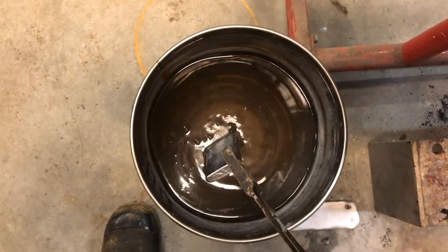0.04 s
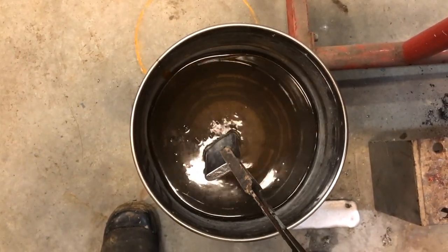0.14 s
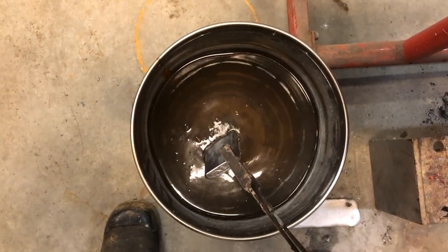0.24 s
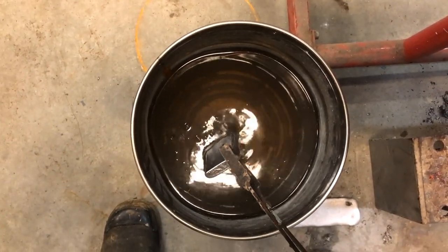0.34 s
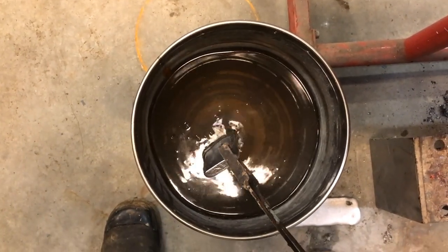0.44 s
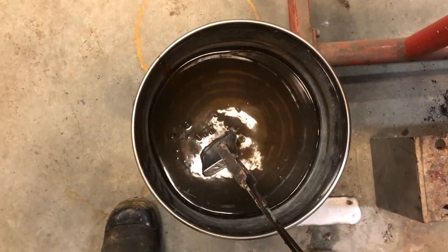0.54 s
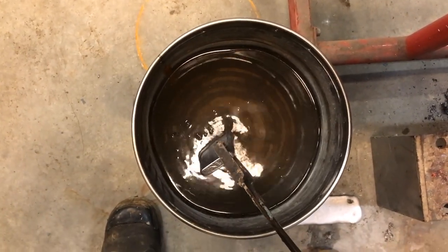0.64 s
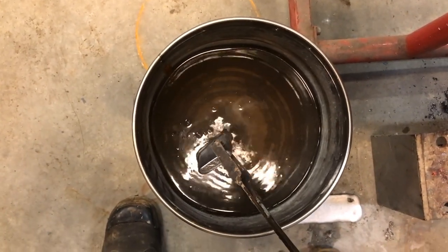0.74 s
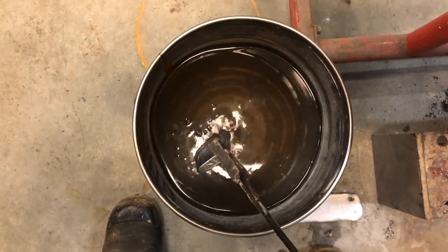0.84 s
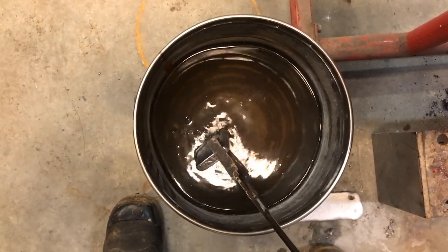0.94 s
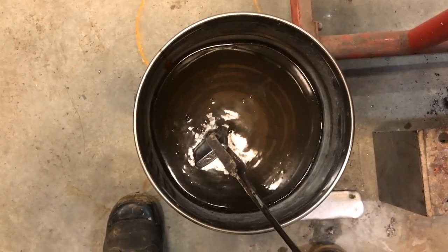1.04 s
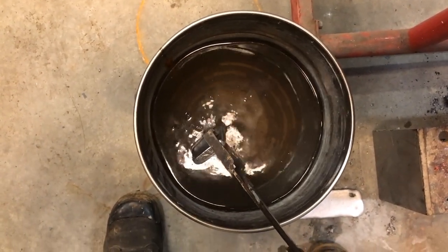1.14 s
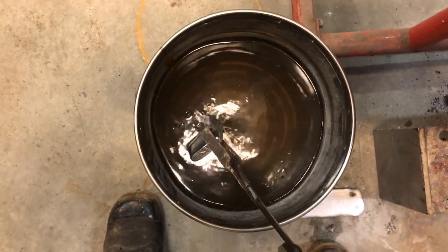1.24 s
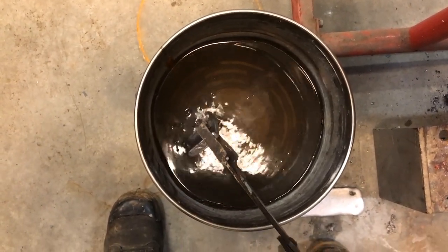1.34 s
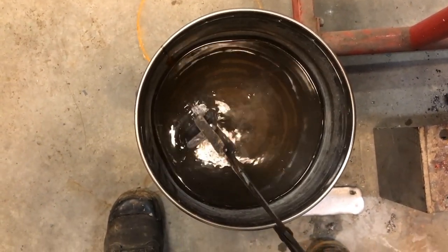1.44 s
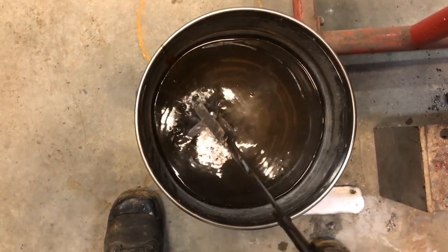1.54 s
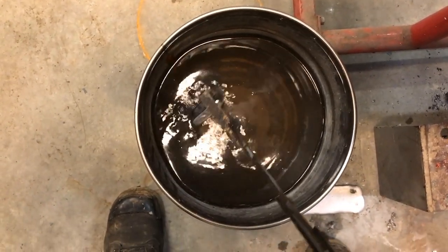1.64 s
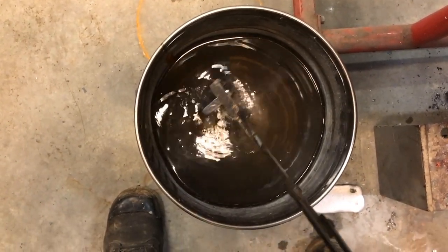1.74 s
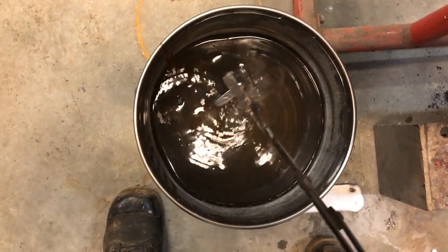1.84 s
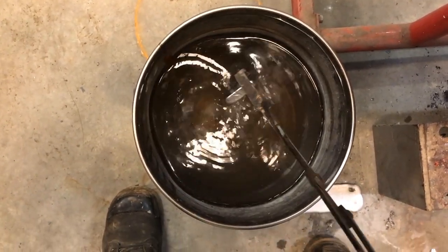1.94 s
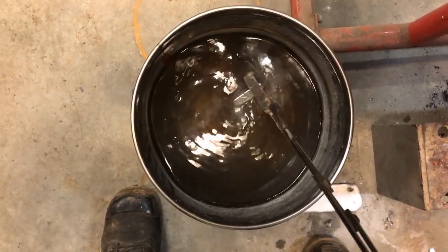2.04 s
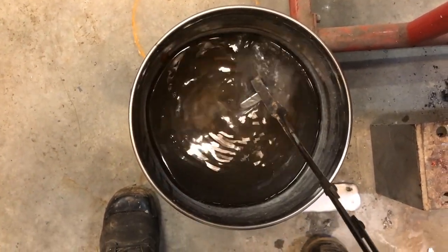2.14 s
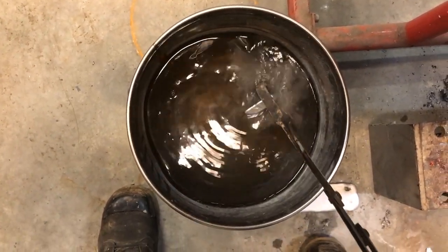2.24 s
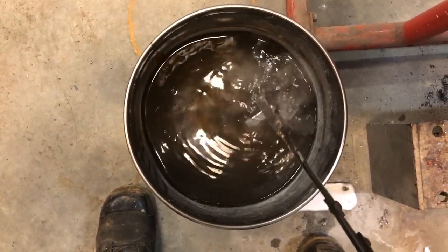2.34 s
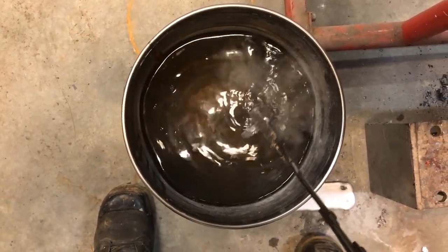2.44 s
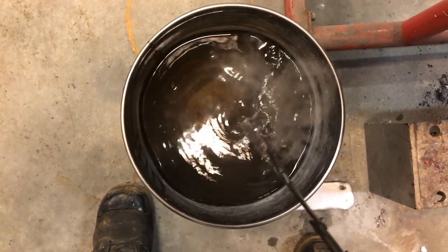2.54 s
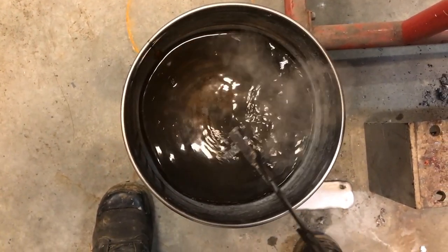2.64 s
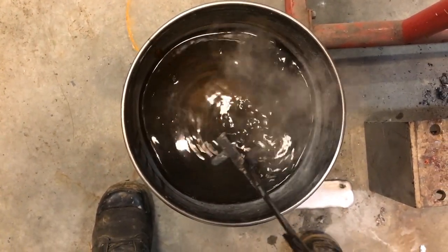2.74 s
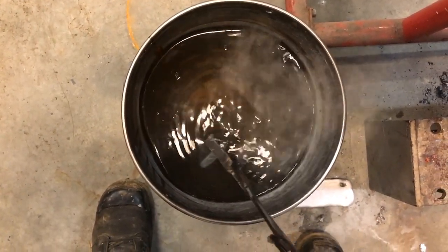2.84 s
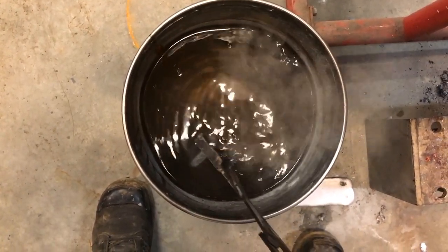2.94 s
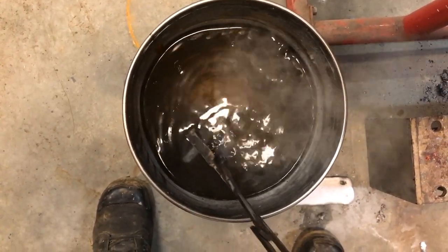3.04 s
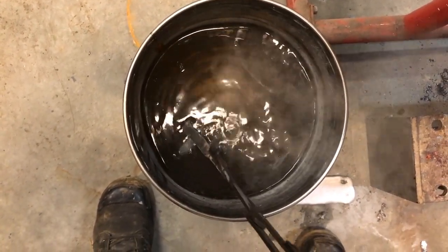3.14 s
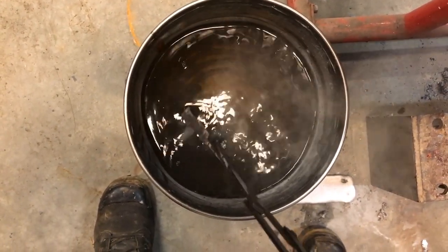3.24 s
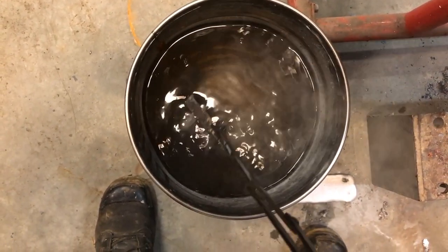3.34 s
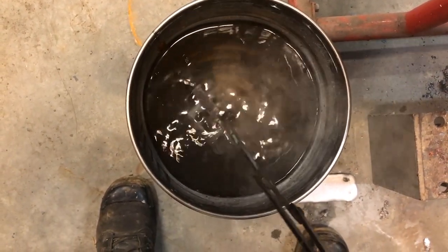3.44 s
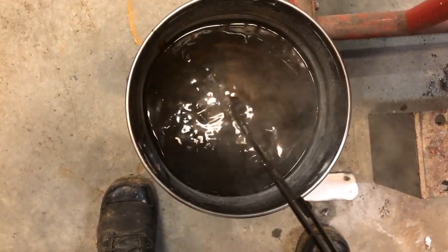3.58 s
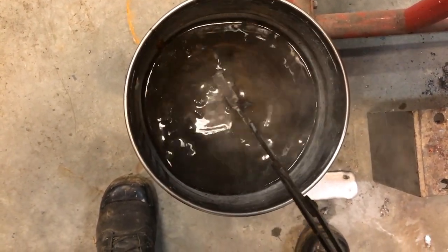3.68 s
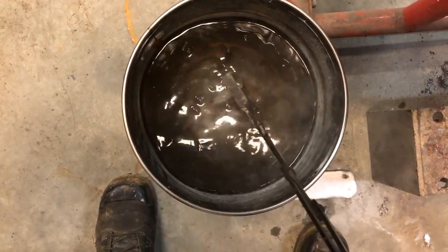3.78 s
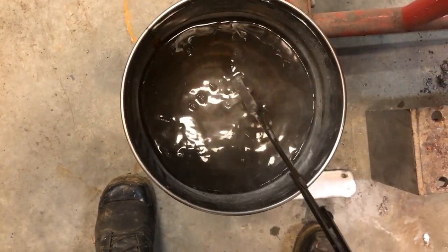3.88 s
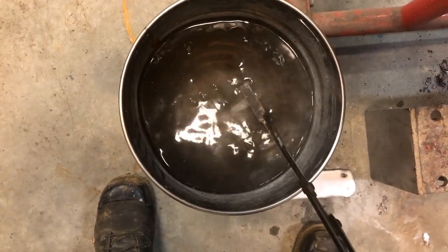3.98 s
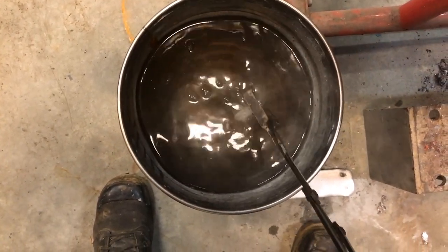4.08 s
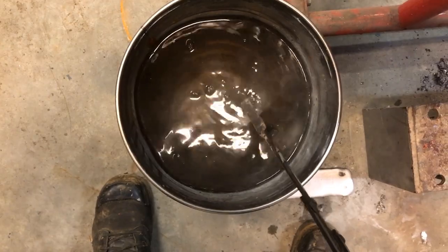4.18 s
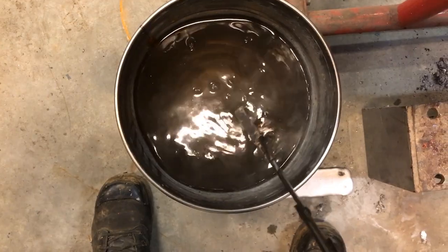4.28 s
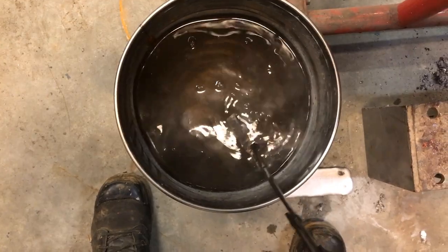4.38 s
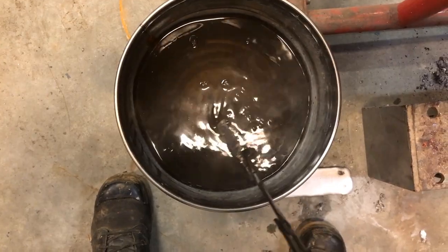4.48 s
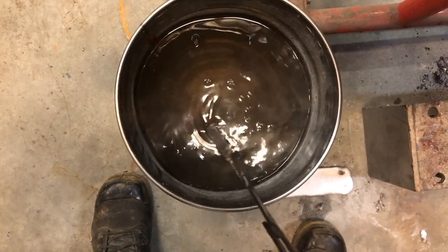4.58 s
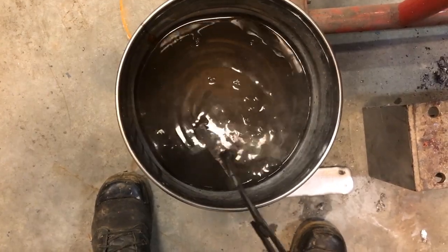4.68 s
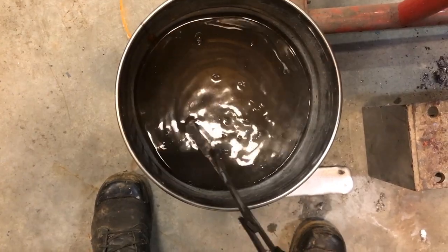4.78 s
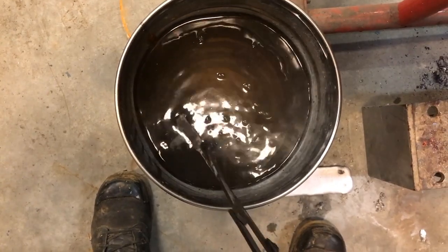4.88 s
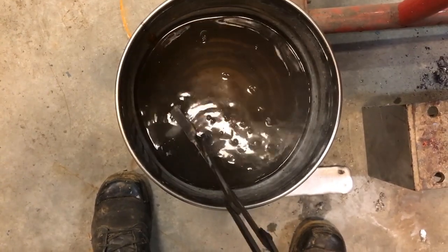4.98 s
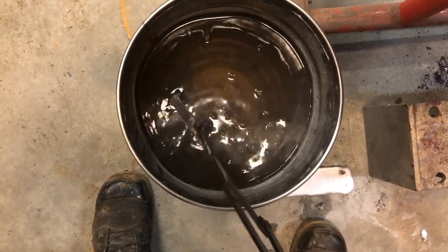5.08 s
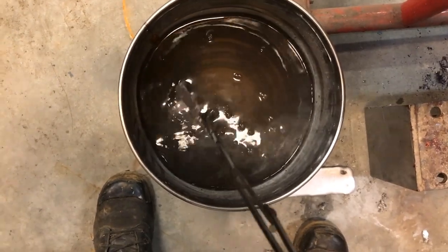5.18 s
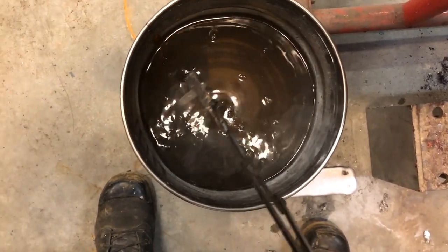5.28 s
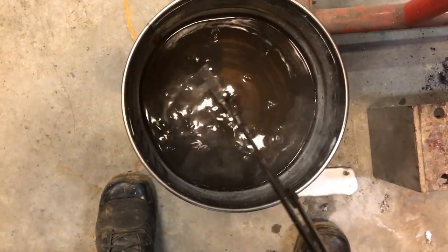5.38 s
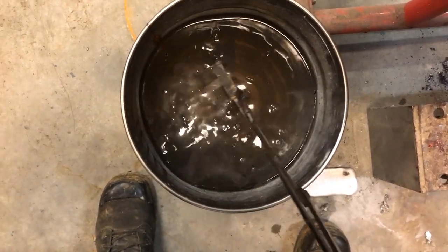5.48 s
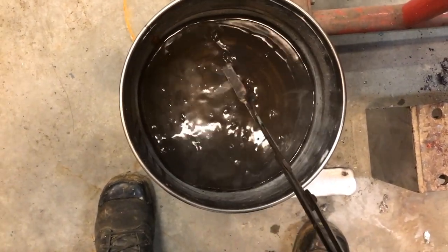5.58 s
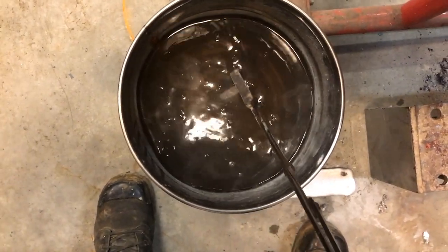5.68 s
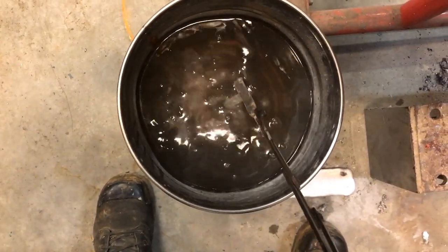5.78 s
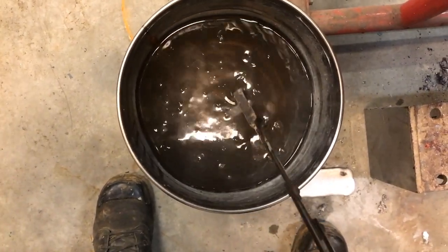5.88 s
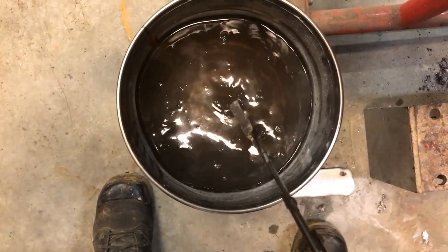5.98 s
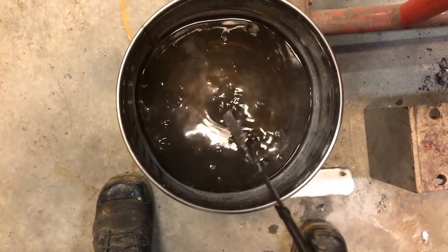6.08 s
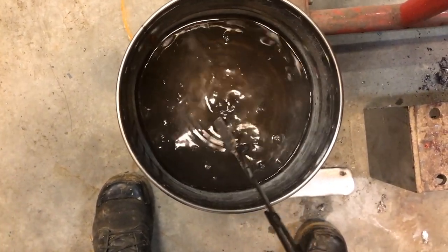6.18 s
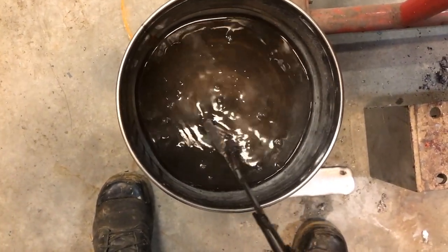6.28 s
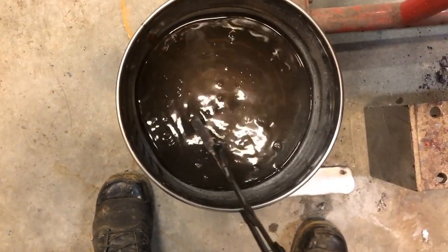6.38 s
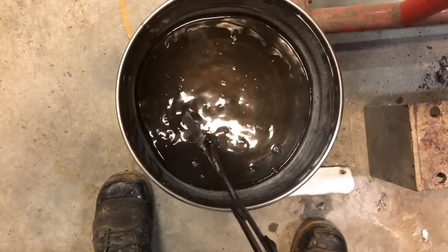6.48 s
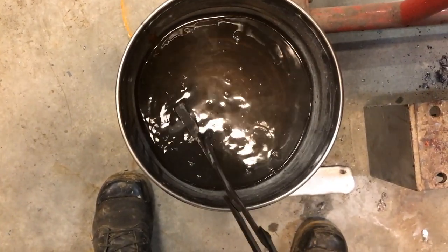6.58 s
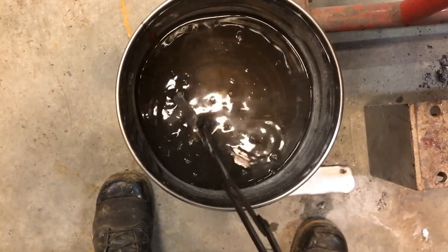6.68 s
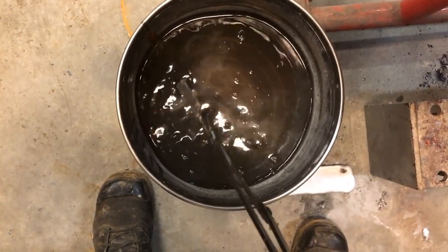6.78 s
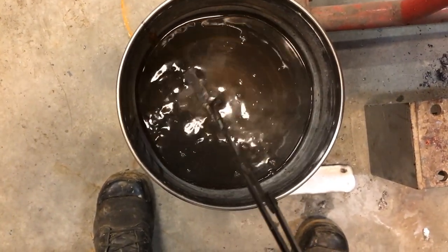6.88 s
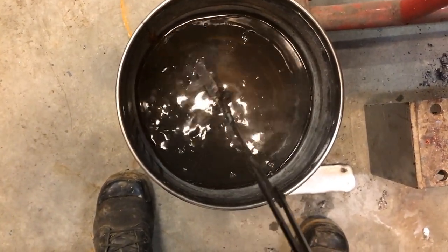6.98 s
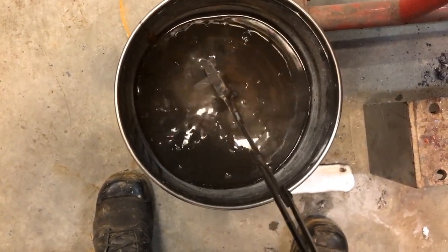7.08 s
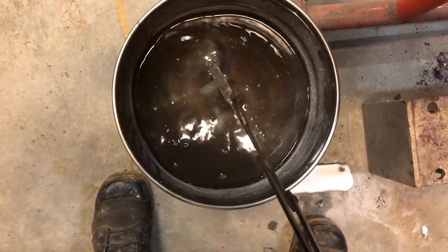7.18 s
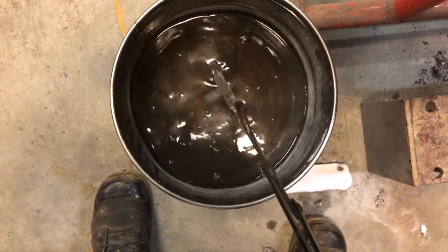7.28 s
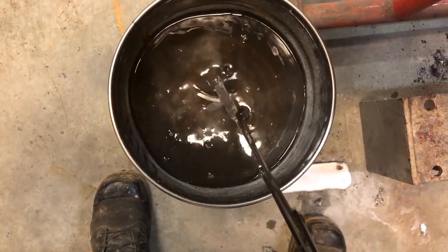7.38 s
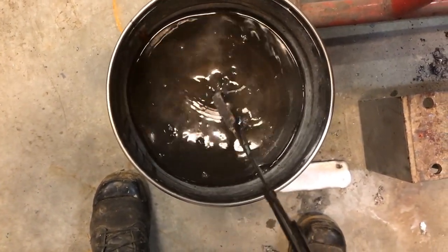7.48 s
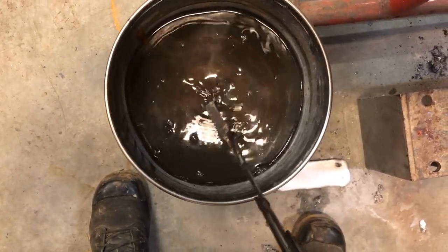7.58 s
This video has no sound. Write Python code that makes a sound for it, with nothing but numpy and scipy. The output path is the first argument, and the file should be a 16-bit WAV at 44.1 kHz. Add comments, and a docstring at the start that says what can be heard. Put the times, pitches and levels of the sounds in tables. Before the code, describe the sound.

From the start, hot steel in a metal bucket of water gives a loud, sputtering hiss, dotted with tiny falling chirps and crackles, heard from close above. The hiss chokes briefly at 1.5 seconds, then surges to its most violent until about 2.6 seconds, with squeaky bubbles, fluttering steam whistles and a few soft, low gulps around 2 seconds. After 3 seconds the hiss weakens, with one more sharp burst of chirps near 3.4 seconds. From 3.5 to 6 seconds, boiling under the water makes the bucket drone hollowly over gentle sloshing as the steel is stirred. A quick cluster of pops and knocks comes between 5.6 and 6.4 seconds. Everything then dies away, leaving a faint, fine fizz over quiet workshop air by 7 seconds, with a soft, low rustle around 7.5 seconds.

```python
"""Hot steel quenching in a metal bucket of water, stirred with tongs; one microphone close above.
Where the bar cuts the surface, steam hisses and whistles and swelling vapour pockets chirp downward.
Under water, collapsing bubbles knock on the bucket, which drones. The cooling bar gives a last few pops,
then only a fine fizz ticks over the quiet of the workshop, with a low rustle at the end."""
import sys
import numpy as np
from scipy import signal
from scipy.fft import rfft, irfft, next_fast_len
from scipy.io import wavfile
from scipy.ndimage import uniform_filter1d

SR = 44100
rng = np.random.default_rng(int(sys.argv[2]) if len(sys.argv) > 2 else 0)


def bounce(signal):
    """Save signal as a 16-bit WAV file at the path given by the first command-line argument."""
    frames = np.transpose(np.atleast_2d(signal))
    limited = np.clip(frames, -1, 1)
    pcm = np.round(limited * 32767).astype(np.int16)
    wavfile.write(sys.argv[1], SR, pcm)


N = 336042
TIME = np.arange(N) / SR
# how violently the surface churns: time_s, share (0-1)
CHURN = [(0, 1), (3.0, 1), (3.6, .35), (7.62, .3)]


def gain_of(db):
    """Decibels to amplitude."""
    return 10 ** (np.asarray(db) / 20)


def unit_rms(x):
    """Scales to rms 1."""
    return x / np.sqrt(np.mean(x ** 2) + 1e-20)


def curves(rows, t=TIME):
    """Each column after a table's time column, read at the times t."""
    times, *columns = np.transpose(rows)
    return [np.interp(t, times, column) for column in columns]


def add(mix, start_s, sound):
    """Mixes a sound in at start_s."""
    part = mix[round(start_s * SR):][:len(sound)]
    part += sound[:len(part)]


def coloured(x, spectrum):
    """Filters x by a spectrum that falls away outside its ends; rms 1."""
    size = next_fast_len(len(x))
    bins_hz = np.fft.rfftfreq(size, 1 / SR)
    hz, db = np.transpose(spectrum)
    shape = gain_of(np.interp(np.log(bins_hz + 1), np.log(hz + 1), db, left=-90, right=-90))
    return unit_rms(irfft(rfft(x, size) * shape, size)[:len(x)])


def resonate(x, hz, width_hz):
    """A steep resonance: twice shifts hz down to zero, smooths and shifts back."""
    turn = np.exp(2j * np.pi * np.cumsum(hz * np.ones(len(x))) / SR)
    pole = np.exp(-np.pi * width_hz / SR)
    for _ in range(2):
        x = 2 * (turn * signal.lfilter([1 - pole], [1, -pole], x / turn)).real
    return x


def ringing(count, hz, width_hz):
    """Noise in a resonance that follows hz; rms 1."""
    return unit_rms(resonate(rng.standard_normal(count), hz, width_hz))


def wander(per_s):
    """A random flutter, about per_s times a second, without slow drift; rms 1."""
    steps = rng.standard_normal(N // 64 + 2)
    span = max(round(SR / 128 / per_s), 1)
    smooth = uniform_filter1d(uniform_filter1d(steps, span), span)
    flutter = smooth - uniform_filter1d(smooth, 6 * span)
    return np.interp(np.arange(N) / 64, np.arange(len(steps)), unit_rms(flutter))


def clicks(per_s, spread_db):
    """Sparse clicks of random sign; a few are large."""
    size = gain_of(spread_db * np.minimum(rng.exponential(1, N), 4)) * rng.choice([-1., 1.], N)
    return size * (rng.random(N) < per_s / SR)


def swells(rows, edge):
    """One hump or dip in dB per row; edge is the share spent rising and falling."""
    out = np.zeros(N)
    for centre_s, length_s, db in rows:
        add(out, centre_s - length_s / 2, db * signal.windows.tukey(round(length_s * SR), edge))
    return out


def steam_rush(patch_db, streak_db):
    """Noise whose colour drifts in short wide patches and long narrow streaks."""
    real, imag, patches, streaks = rng.standard_normal((N // 128 + 5, 257, 4)).T
    patches = unit_rms(uniform_filter1d(uniform_filter1d(patches, 7, axis=0), 14, axis=1))
    streaks = unit_rms(uniform_filter1d(uniform_filter1d(streaks, 2, axis=0), 90, axis=1))
    (churn,) = curves(CHURN, np.arange(real.shape[1]) * 128 / SR)
    spectra = (real + 1j * imag) * gain_of(patch_db * churn * patches + streak_db * streaks)
    return unit_rms(signal.istft(spectra, nperseg=512, noverlap=384)[1][:N])


def steam():
    """Steam sputters as the vapour film tears and closes; narrow bands and small pockets ride on it."""
    # steam at the surface: time_s, hiss_db, body_db, air_db (the last two against the hiss)
    levels = [(0, -30.5, -13.5, -5), (.47, -33, -13, -4), (.8, -31, -11.5, -7), (1.1, -34, -29, -5.5),
              (1.4, -35, -14.5, -3.5), (1.55, -27.5, -4, -6.5), (1.74, -34, 1, -3), (1.9, -30, 0, -4),
              (2.01, -38.5, -9, 1.5), (2.14, -34, 0, -7.5), (2.37, -26.5, -6.5, -1), (2.49, -30, -2, -6.5),
              (2.59, -33, 0, -6.5), (2.63, -36, -5, -8.5), (2.72, -38.5, -6.5, -7.5), (2.95, -41, -7, -7.5),
              (3.05, -46.5, 3.5, 0.5), (3.23, -53, 3, -2), (3.3, -44.5, -14, -4), (3.41, -41, 4, -7),
              (3.5, -49, 1.5, -5.5), (3.85, -47.5, -5, -8), (4.18, -50, -0.5, -7), (4.65, -52, -2, 1),
              (5.1, -52, -3.5, -5.5), (5.5, -57, -3.5, -5.5), (5.85, -63, 8.5, -0.5), (6.27, -55, -13, 2),
              (6.5, -61.5, -8, 3.5), (6.71, -64, -9, 1.5), (6.98, -78, -2, 1.5), (7.3, -80, -4.5, -1.5),
              (7.62, -73.5, -7, 3)]
    # its middle, high and top ranges: frequency_hz, level_db
    body = [(1000, -30.5), (1900, -4.5), (2600, 2), (3200, 4), (4300, 0.5), (5200, -12), (7000, -52.5)]
    hiss = [(2500, -32.5), (4200, -8), (5400, 2), (6800, 2.5), (7700, -0.5), (8500, -0.5), (9600, -3),
            (10400, -17), (12000, -30)]
    air = [(8000, -19.5), (10200, -6.5), (11500, -2), (13000, -3), (16000, -8.5)]
    # steam spurts through the torn film: centre_s, length_s, change_db
    spurts = [(.056, .025, 0.5), (.145, .03, 1), (.565, 0.12, 2.5), (.655, .02, 1.5), (.79, 0.024, 3),
              (.86, 0.077, 3), (.97, 0.19, 3.5), (1.12, 0.093, 5), (1.208, 0.011, 1), (1.23, 0.13, 4),
              (1.231, .01, 4), (1.273, .01, 4.5), (1.36, 0.1, 3), (1.45, 0.17, 4.5), (1.59, 0.041, 4.5),
              (1.89, 0.037, 1.5), (2.1, 0.063, 9), (2.16, 0.04, 6), (2.58, 0.065, 3), (2.632, 0.018, 4),
              (2.66, 0.039, 4), (2.8, 0.036, 3), (2.765, .04, 1), (2.84, .02, -5), (2.865, .03, 2),
              (2.895, .02, 1), (2.935, .02, 5), (2.957, 0.024, 4.5), (3.41, 0.023, 7), (3.54, 0.056, 5)]
    # brief dips in the hiss (near 1.5 s a dunk chokes the steam): centre_s, length_s, change_db
    dips = [(1.495, 0.094, -12.5), (2.3, 0.051, -6), (3.9, .03, -4), (1.5, 0.017, -13)]
    hiss_db, body_db, air_db = curves(levels)
    (churn,) = curves(CHURN)
    surge_db = swells(spurts, edge=1.0) + swells(dips, edge=0.41)
    air_db -= 0.09 * surge_db  # the top range surges a little less
    rush = steam_rush(patch_db=1.7, streak_db=1.7)
    rush += 0.076 * churn * unit_rms(clicks(3000, spread_db=9))
    sputter = gain_of(churn * (.6 * wander(12) + .8 * wander(30) + .7 * wander(110)))
    spray = coloured(rush, hiss)
    spray += gain_of(body_db) * coloured(rush, body) + gain_of(air_db) * coloured(rush, air)
    crowd = gain_of(-4) * small_pockets()
    return gain_of(hiss_db + surge_db) * (sputter * (spray + whistling_bands()) + crowd)


def whistling_bands():
    """Faint narrow whistling bands in the hiss, each fading in and out."""
    # bands: start_s, length_s, start_hz, end_hz, width_hz, level_db (against the hiss)
    bands = [(0, 0.34, 8700, 8900, 500, -9), (0.246, 0.26, 7100, 7140, 400, -8),
             (0.804, 0.76, 6930, 6540, 500, -7), (0.923, 0.57, 5550, 6200, 400, -3.5),
             (2.066, 0.25, 4640, 4900, 350, -6), (2.461, 0.29, 5220, 5530, 349, -4),
             (2.922, 0.34, 7080, 7400, 120, -4.5), (3.244, 0.1, 10000, 5400, 900, -3.5),
             (3.414, 0.13, 8070, 8400, 250, 1.5), (3.894, 0.69, 6600, 6900, 500, -4.5),
             (4.302, 1.0, 2820, 3040, 220, -3), (4.75, 0.49, 5200, 5750, 300, -5.5),
             (4.798, 0.7, 8800, 8400, 400, -8), (4.9, 0.76, 7300, 7270, 120, -10),
             (5.056, 0.87, 6780, 6770, 110, -8), (5.097, .55, 5530, 5340, 250, -12),
             (6.154, 0.33, 8500, 8350, 300, -1.5), (6.0, 0.85, 12460, 12100, 300, -11)]
    out = np.zeros(N)
    for start_s, length_s, start_hz, end_hz, width_hz, db in bands:
        hz = np.geomspace(start_hz, end_hz, round(length_s * SR))
        add(out, start_s, gain_of(db) * ringing(len(hz), hz, width_hz) * signal.windows.tukey(len(hz), .5))
    return out


def pocket_chirp(core_s, start_hz, end_hz, rough):
    """A vapour pocket's ring falls as it swells, then levels off; steam breaks up the rough share."""
    progress = np.linspace(0, 1, round(1.35 * core_s * SR))  # the fades reach beyond the core
    hz = end_hz * (start_hz / end_hz) ** (1.2 * (1 - progress) ** 1.4)
    tone = np.sin(2 * np.pi * (np.cumsum(hz) / SR + rng.random()))
    breath = ringing(len(hz), hz, end_hz / 5) / np.sqrt(2)
    envelope = np.sin(np.pi * progress) ** 1.3
    return (np.sqrt(1 - rough) * tone + np.sqrt(rough) * breath) * envelope


def small_pockets():
    """A crowd of small vapour pockets chirps at random, in 24 sizes."""
    # crowd density: time_s, pockets_per_s
    density = [(0, 344), (1.45, 314), (1.5, 120), (2.7, 140), (3.05, 150), (3.2, 60), (3.5, 60), (3.7, 9.5),
               (7.62, 7.6)]
    (per_s,) = curves(density)
    out = np.zeros(N)
    for hz in np.geomspace(2900, 6500, 24):
        chirp = pocket_chirp(rng.uniform(.003, .009), rng.uniform(1.05, 1.5) * hz, hz, rough=.7)
        births = gain_of(3 * rng.standard_normal(N)) * (rng.random(N) < per_s / 24 / SR)
        out += signal.oaconvolve(births, chirp)[:N]
    return out


def bucket():
    """Collapsing bubbles ring the bucket, sharper ones its high modes; bubbles hum and water sloshes."""
    # boiling under water: time_s, drone_db, sharpness_db, slosh_db
    boil = [(0, -59.5, 7, -70), (.31, -58.5, 5, -74), (.45, -50, -2, -69), (.85, -56, 4.5, -66),
            (1.05, -49, -3, -69), (1.38, -51.5, 0, -63), (1.63, -48.5, 0.5, -60), (2.3, -49, 0, -57),
            (2.5, -50.5, 1, -60.5), (2.8, -55, 8, -63), (3, -46.5, 2.5, -65.5), (3.3, -46.5, 2, -56.5),
            (3.5, -41, -3, -63), (4.5, -39.5, -5, -58), (4.87, -43.5, -2, -60.5), (5.3, -43.5, -3, -60.5),
            (5.65, -38.5, -6, -58), (5.84, -38.5, -6, -57), (5.98, -43.5, -5, -54), (6.17, -51, -1, -65),
            (6.43, -60, 2, -65), (6.7, -72, 1, -71), (7.04, -78.5, 3, -74.5), (7.35, -83, 5.5, -74.5),
            (7.5, -73.5, -3, -72.5), (7.62, -73.5, -4.5, -71.5)]
    # the bucket's modes: pitch_hz, width_hz, level_db
    modes = [(410.4, 68.5, -4), (365.6, 66, -12), (470.5, 120, -8.5), (612, 55, -25), (924, 47, -22.5),
             (834, 76, -12.5), (990, 910, -12.5), (1326, 650, -8.5), (1562, 76, -7), (1644, 60, -9),
             (1733, 170, -7.5), (2070, 90, -17.5), (2310, 250, -19.5), (2578, 320, -12), (3010, 450, -14)]
    # its upper ring against the drone: time_s, level_db
    upper_ring = [(0, 1), (1.3, -4.5), (2, 6.5), (3.2, 1), (3.6, -6), (4.0, 0), (4.5, 0), (5.1, 0.5),
                  (5.7, -3.5), (6, -11), (6.3, 2), (6.85, 3), (7.05, -16.5)]
    # colours of knock and slosh: frequency_hz, level_db
    knock_colour = [(150, -41.5), (300, 1), (600, 11), (1100, 2.5), (1900, 6.5), (3000, -3.5),
                    (5000, -50.5)]
    slosh_colour = [(25, -26), (45, -8), (80, 1.5), (160, 1), (250, 5), (400, -5.5)]
    # large bubbles thump the wall: start_s, level_db
    wall_thumps = [(2.171, -35), (2.264, -34), (4.277, -34), (5.625, -33), (5.644, -28), (5.726, -31),
                   (5.752, -36), (5.795, -37), (5.817, -31), (5.825, -28.5), (5.842, -29.5), (5.876, -28.5),
                   (5.937, -32.5), (5.98, -40), (6.024, -39), (6.085, -45), (6.166, -42)]
    # the bubble cloud on the bar rings higher as its bubbles shrink: time_s, pitch_hz, level_db
    bubble_cloud = [(3.5, 991, -60), (3.8, 1214, -46.5), (4.2, 1480, -47.5), (4.7, 1620, -48.5),
                    (5.3, 1480, -45), (5.6, 1140, -58), (5.9, 1030, -49.5), (6.2, 1280, -53),
                    (6.6, 1395, -75), (6.9, 1400, -86)]
    drone_db, sharp_db, slosh_db = curves(boil)
    (upper_db,) = curves(upper_ring)
    cloud_hz, cloud_db = curves(bubble_cloud)
    collapses = unit_rms(clicks(5000, spread_db=3)) * gain_of(wander(28) + wander(5.3))
    thumps = np.zeros(N)
    for start_s, db in wall_thumps:
        add(thumps, start_s, gain_of(db) * np.diff(np.hanning(110)))  # a push, then a pull
    out = gain_of(drone_db + sharp_db) * coloured(collapses, knock_colour)
    for hz, width_hz, db in modes:
        level_db = drone_db + db + sharp_db * (hz > 600) + upper_db * (hz > 1400)
        level_db += wander(1.4)  # the stirred bar couples to each mode by turns
        out += gain_of(level_db) * unit_rms(resonate(collapses, hz, width_hz))
        click_peak = 2 * np.pi * width_hz / (np.e * SR)
        out += gain_of(db) * resonate(thumps, hz, width_hz) / click_peak
    cloud = gain_of(cloud_db) * ringing(N, cloud_hz, width_hz=350)
    slosh = coloured(rng.standard_normal(N), slosh_colour) * gain_of(slosh_db + 1.7 * wander(14))
    return out + cloud + slosh


def fizz():
    """Tiny bubbles burst at the surface, each size ticking at its own high pitch."""
    # fizz: time_s, level_db
    levels = [(0, -66), (6.4, -71.5), (6.9, -74), (7.62, -76)]
    sizes = [(6400, -5.0), (7400, -0.5), (8500, 0.5), (12500, -4.0)]  # pitch_hz, level_db
    ticks = sum(gain_of(db) * resonate(clicks(45, spread_db=4), hz, width_hz=1500) for hz, db in sizes)
    return gain_of(curves(levels)[0]) * unit_rms(ticks)


def workshop():
    """Steady room tone, mostly low rumble."""
    # workshop air: frequency_hz, level_db
    colour = [(20, -30.5), (40, -4), (110, 0), (220, -14.5), (600, -21), (1500, -30.5), (2800, -30),
              (4200, -30.5), (5500, -35.5), (8000, -28), (11000, -33), (14500, -33), (16000, -40.5)]
    return gain_of(-74) * coloured(rng.standard_normal(N), colour)


def echoes(x, decay_s=0.071):
    """Short tail of the bucket's mouth and the concrete floor: sparse taps of random sign."""
    taps = np.zeros(6000)
    delays = np.arange(100, 5980, 20) + rng.integers(0, 20, 294)
    taps[delays] = rng.choice([-1., 1.], 294) * gain_of(-60 * delays / SR / decay_s)
    return signal.oaconvolve(x, taps / np.linalg.norm(taps))[:N]


def large_pockets():
    """Large vapour pockets swell on the steel, one chirp each."""
    # pockets: start_s, core_s, start_hz, end_hz, level_db
    pockets = [(0.053, 0.0096, 3610, 2320, -26), (0.167, 0.013, 2804, 2400, -25),
               (0.281, .0095, 2980, 2140, -29.5), (0.552, 0.0095, 4124, 2640, -23),
               (.562, 0.01, 2058, 1520, -24), (0.65, 0.00793, 4330, 2880, -23.5),
               (0.748, 0.0048, 3950, 3650, -27.5), (0.789, 0.007, 4000, 3700, -25),
               (0.856, 0.015, 3577, 1664, -28.5), (0.912, .01, 4410, 3060, -34),
               (1.226, 0.011, 4530, 3500, -30), (1.007, 0.0065, 3420, 3200, -27),
               (1.17, .008, 4200, 3000, -33.5), (1.25, .012, 3930, 2620, -35),
               (1.295, 0.011, 3640, 2500, -34.5), (1.028, 0.011, 5170, 2520, -27.5),
               (1.323, 0.013, 4650, 2880, -30.5), (1.378, 0.015, 3780, 1580, -26),
               (1.381, 0.0068, 3580, 3010, -21), (1.428, 0.015, 3364, 2120, -20),
               (1.433, 0.022, 2770, 1430, -24.5), (1.438, .016, 3104, 2960, -19.5),
               (1.444, 0.0096, 1975, 1306, -19.5), (1.539, 0.019, 3605, 3240, -22),
               (1.567, 0.029, 4520, 3140, -20.5), (1.62, 0.012, 3340, 2500, -22),
               (1.639, 0.017, 3385, 2610, -21), (1.659, 0.0055, 3010, 2940, -13.5),
               (1.696, 0.015, 3320, 2850, -19.5), (1.707, 0.012, 4150, 4230, -23),
               (1.709, 0.0096, 3110, 2674, -12.5), (1.735, 0.033, 3050, 3100, -23),
               (1.758, 0.015, 2930, 2980, -21), (1.763, .008, 3440, 3180, -20),
               (1.838, .008, 3100, 2800, -22.5), (1.867, .006, 3250, 3100, -23),
               (1.88, .012, 3200, 2500, -23), (1.582, .012, 3100, 2650, -23),
               (1.789, 0.0093, 3353, 2910, -14.5), (1.815, 0.0083, 3184, 3000, -16),
               (1.853, 0.01, 3440, 3100, -22), (1.898, 0.013, 2884, 1374, -24),
               (1.94, 0.0062, 3550, 3500, -22), (1.956, 0.0075, 3440, 2920, -17),
               (1.959, 0.007, 3310, 2200, -22.5), (1.984, 0.0044, 3200, 2880, -16),
               (2.001, .0067, 5200, 5300, -24.5), (2.083, 0.043, 5080, 4200, -25),
               (2.098, .019, 3040, 2580, -24.5), (2.139, 0.017, 2770, 2740, -23.5),
               (2.154, 0.009, 2120, 2030, -24), (2.159, .011, 1793, 1270, -22),
               (2.208, .008, 2140, 2050, -17), (2.198, 0.026, 4700, 4630, -26),
               (2.213, 0.011, 1847, 1183, -14), (2.263, 0.0065, 2230, 2030, -18),
               (2.273, 0.009, 2860, 2440, -20), (2.281, 0.011, 1670, 1150, -23),
               (2.362, 0.0062, 2220, 1960, -23), (2.442, .01, 2120, 2050, -22),
               (2.474, 0.0096, 1620, 1500, -21), (2.35, 0.0097, 1814, 1610, -9.5),
               (2.354, 0.018, 4910, 3990, -19), (2.364, 0.0069, 4310, 4160, -18.5),
               (2.366, 0.0081, 1710, 1080, -24.5), (2.389, 0.017, 3720, 2720, -21.5),
               (2.414, 0.014, 1670, 1620, -18.5), (2.417, .034, 3490, 2970, -29),
               (2.435, 0.0098, 1660, 1660, -18), (2.458, 0.018, 2770, 1520, -31),
               (2.459, 0.017, 1564, 1600, -18.5), (2.51, 0.008, 2040, 1640, -30),
               (2.548, 0.013, 3510, 3150, -28), (2.583, .022, 3410, 2540, -33),
               (2.799, 0.018, 3465, 2910, -31.5), (2.518, 0.013, 3600, 2900, -28),
               (2.63, 0.008, 3480, 2680, -31), (2.657, 0.0068, 5600, 5170, -28),
               (2.664, 0.0096, 3290, 2500, -28.5), (2.761, .006, 3500, 3180, -34),
               (2.806, 0.0075, 2800, 2500, -31), (2.86, .006, 4400, 4200, -36),
               (2.789, .007, 3830, 3540, -28), (2.811, .008, 3250, 3050, -32),
               (2.817, .006, 4430, 4100, -36), (2.837, .006, 5500, 5300, -34),
               (2.852, .006, 5500, 5250, -34), (2.934, .008, 3700, 3100, -34),
               (2.936, .006, 6400, 6200, -34), (3.075, 0.0099, 1850, 1780, -36),
               (2.893, 0.0096, 4380, 4200, -32.5), (2.93, 0.0058, 4500, 4100, -31),
               (2.952, 0.0086, 3550, 3330, -29.5), (3, 0.007, 3040, 2840, -34),
               (0.146, 0.0066, 4500, 4100, -27), (0.2, 0.0069, 3900, 3560, -33),
               (.32, .007, 3480, 3020, -29.5), (0.339, .006, 4640, 3980, -33),
               (0.355, 0.012, 4900, 2980, -36), (0.413, 0.009, 3330, 2300, -33),
               (.515, 0.0085, 3780, 3370, -29), (0.682, 0.0053, 3970, 3680, -27),
               (.79, 0.008, 2900, 2430, -30), (0.881, 0.0084, 3410, 2880, -27),
               (0.985, 0.013, 3410, 2000, -35.5), (1.143, 0.01, 4660, 3300, -31),
               (1.359, 0.0074, 3700, 2720, -32), (1.402, .006, 4900, 4400, -25),
               (3.266, 0.0074, 10200, 9000, -37), (3.29, .007, 5630, 4930, -40),
               (3.323, .007, 4690, 4310, -39), (3.339, 0.0047, 6100, 3600, -29.5),
               (3.379, 0.0054, 3600, 3300, -29), (3.443, 0.0046, 7070, 4000, -30),
               (3.342, .0056, 3390, 3430, -30.5), (3.356, 0.0043, 4100, 4240, -29),
               (3.362, 0.0042, 3600, 3300, -28), (3.393, 0.0065, 3390, 3240, -22),
               (3.406, 0.01, 3212, 2336, -15), (3.445, 0.0095, 3970, 3220, -22.5)]
    out = np.zeros(N)
    for start_s, core_s, start_hz, end_hz, db in pockets:
        add(out, start_s - core_s / 6, gain_of(db) * pocket_chirp(core_s, start_hz, end_hz, rough=.3))
    return out


def whistles():
    """Steam gaps beside the swept bar whistle, throbbing as they open and shut."""
    # one path per gap: time_s, level_db, pitch_hz
    gaps = [
        [(1.52, -32, 3430), (1.666, -41.5, 2910), (1.736, -42, 2960), (1.814, -27.5, 3100),
         (1.948, -39.5, 3230), (2.0, -59, 3100)],
        [(2.13, -29.5, 1630), (2.216, -43.5, 1620), (2.316, -32, 1690), (2.384, -36.5, 1684),
         (2.474, -29.5, 1540), (2.584, -40.5, 1648), (2.68, -45, 1740)],
        [(2.33, -35.5, 6030), (2.365, -30, 4320), (2.4, -28, 3460), (2.44, -26, 2960), (2.475, -28, 2410),
         (2.504, -49, 3525), (2.56, -51, 3550), (2.62, -51, 3090)],
    ]
    # each gap's resonance: width_hz
    widths = [700, 390, 1000]
    out = np.zeros(N)
    for path, width_hz in zip(gaps, widths):
        t = np.arange(path[0][0], path[-1][0], 1 / SR)
        db, hz = curves(path, t)
        ring = ringing(len(t), hz, width_hz)
        throb = gain_of(4.1 * wander(45) + 2.5 * wander(160))[:len(t)]
        add(out, t[0], gain_of(db) * ring * throb * signal.windows.tukey(len(t), .1))
    return out


def gulps():
    """The water gulps as the bar turns: a low, loose resonance swells and dies."""
    # gulps: peak_s, level_db
    peaks = [(1.998, -42.5), (2.09, -47.5), (2.264, -51)]
    rise_db_per_s, fall_db_per_s = 352, 299.5
    level = sum(gain_of(db + np.minimum(rise_db_per_s * (TIME - s), fall_db_per_s * (s - TIME)))
                for s, db in peaks)
    return level * ringing(N, hz=230, width_hz=110)


def pops():
    """Single bubbles collapse on the cooling bar, each sounding three short rings with a soft start."""
    # collapses: start_s, peak_db
    collapses = [(5.747, -36), (5.823, -26), (5.877, -29), (5.944, -30), (5.978, -42), (6.024, -36),
                 (6.041, -30), (6.079, -33), (6.114, -37), (6.125, -36), (6.136, -37), (6.166, -41),
                 (6.202, -37), (6.234, -47), (6.367, -44)]
    # rings of one pop: pitch_hz, width_hz, level_db
    rings = [(886, 260, 1), (1540, 380, -0.5), (3180, 1500, -13)]
    kicks, t = np.zeros(N), np.arange(600) / SR
    for start_s, db in collapses:
        add(kicks, start_s, gain_of([db]))
    pop = sum(gain_of(db) * np.sin(2 * np.pi * hz * t) * width_hz * t * np.exp(-2 * np.pi * width_hz * t)
              for hz, width_hz, db in rings)
    return signal.oaconvolve(kicks, pop / abs(pop).max())[:N]


def rustle():
    """A low rustle swells nearby at the end."""
    # rustle: time_s, level_db
    levels = [(7.35, -85), (7.46, -72), (7.62, -68.5)]
    return gain_of(curves(levels)[0]) * ringing(N, hz=420, width_hz=600)


def scene():
    """Everything at one spot below the microphone, in mono."""
    surface = large_pockets() + whistles() + fizz() + pops()
    tail = gain_of(-10) * echoes(surface)
    return (surface + tail + steam() + bucket() + gulps() + rustle() + workshop())[None]


def record(dry, cutoff_hz=15780):
    """The recorder's band limit."""
    lowpass = signal.firwin(1023, cutoff_hz, window=("kaiser", 9), fs=SR)
    return signal.oaconvolve(dry, lowpass[None], "same")


dry = scene()
out = record(dry)
bounce(out)
```